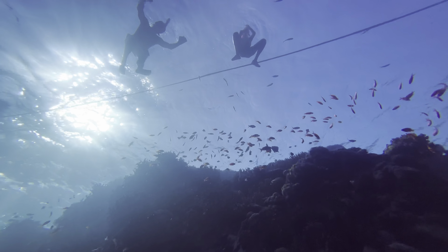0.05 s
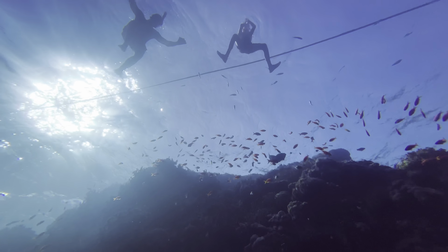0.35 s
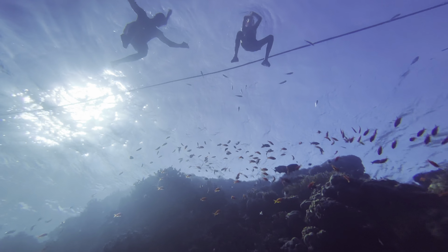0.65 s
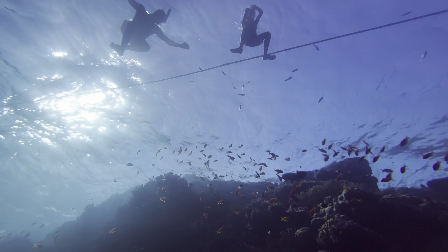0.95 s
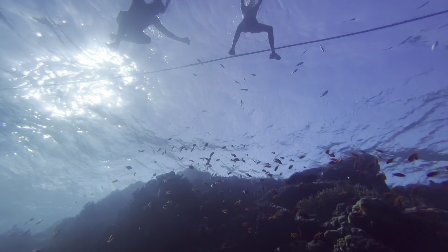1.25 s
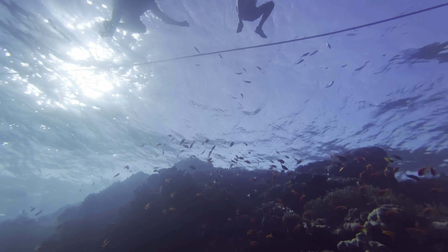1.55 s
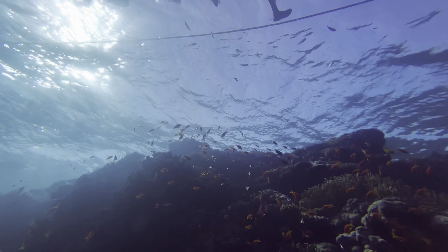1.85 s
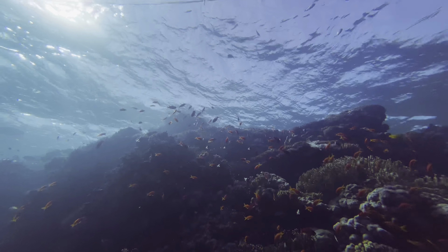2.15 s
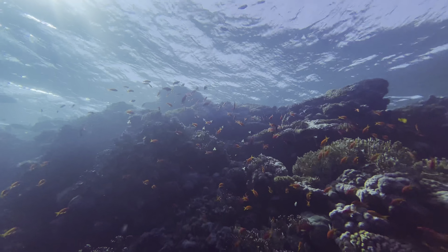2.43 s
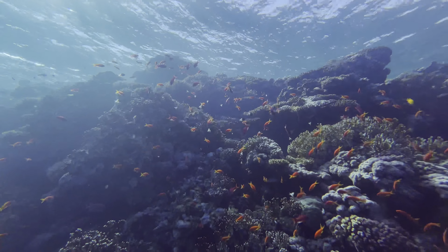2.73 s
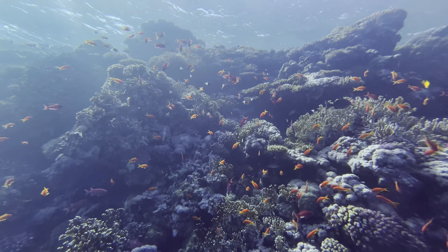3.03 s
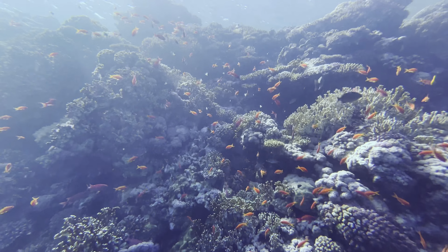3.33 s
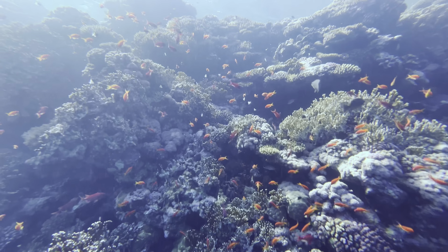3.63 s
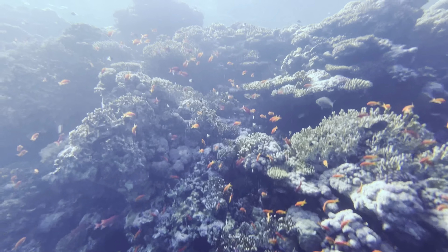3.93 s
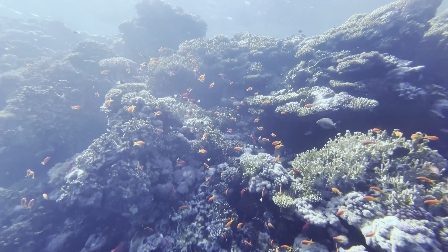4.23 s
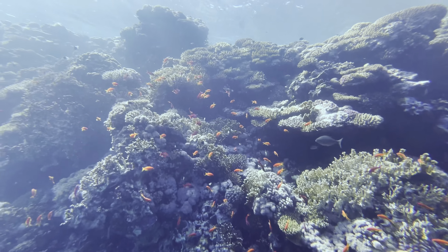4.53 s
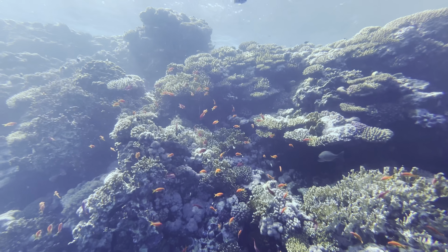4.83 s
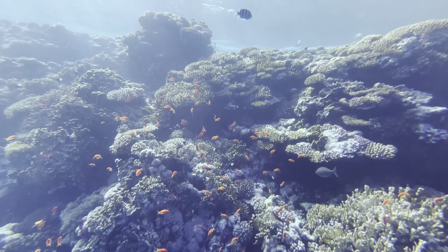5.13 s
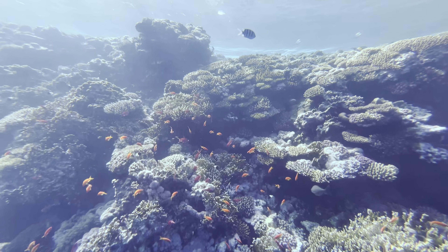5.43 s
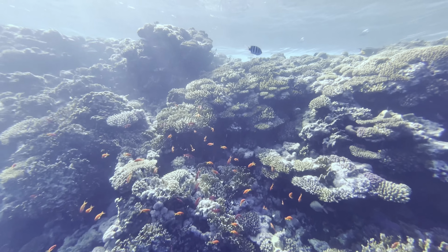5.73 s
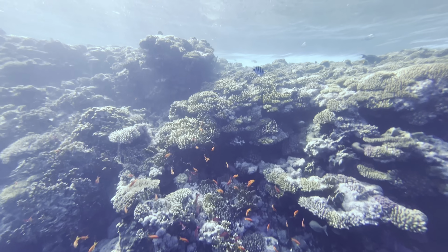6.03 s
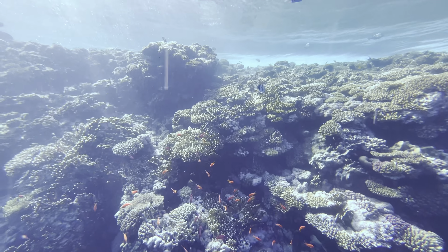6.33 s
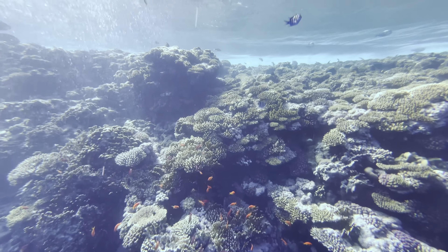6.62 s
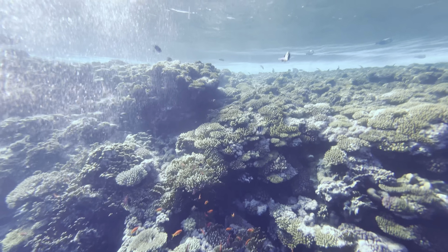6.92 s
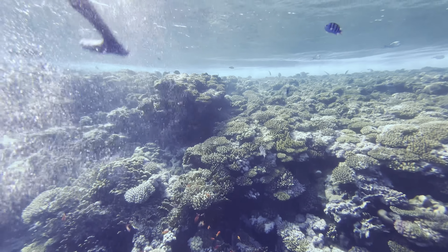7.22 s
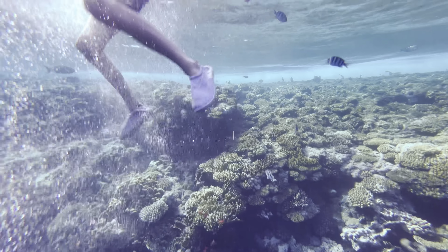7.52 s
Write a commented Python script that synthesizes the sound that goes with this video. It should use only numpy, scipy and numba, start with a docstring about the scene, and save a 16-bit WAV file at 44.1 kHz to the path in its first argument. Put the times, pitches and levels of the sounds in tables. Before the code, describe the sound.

Everything is muffled, heard underwater through a camera housing rising over a coral reef. A low rumble and faint sloshing run throughout, with scattered sharp shrimp clicks and a soft hollow drone. Two dull thumps come at the start, a knock at 1 second, a faint distant splash around 1.4 and a bubble plink at 2.2. From about 3.5 seconds the water gets busier and louder: bubbles plink, gurgle and fizz, water slaps the shell, and hollow gulps ring while the drone swells and sinks steadily in pitch. Splash thumps stand out between 4.5 and 5.2 seconds. The rumble deepens around 6 seconds under a fine sizzle of tiny bubbles. At 7.3 a swimmer's splash lands as a loud, deep boom with a knock; the bubbling and crackle drop fast, then partly recover as more heavy booms hit around 7.7 seconds.

```python
"""A camera in a watertight housing rises over a coral reef towards swimmers at the surface.
At first water rumbles and sloshes faintly, shrimp snap and a stroke splashes far off. On the way up,
gulps ring an air cavity that booms ever lower, bubbles plink, water slaps the shell and splashes arrive
as falling thumps. Near the end, after a loud boom, the water sounds drop fast and partly recover.
All is heard through the ringing housing and a limiter."""
import sys
import numpy as np
from scipy import signal
from scipy.fft import rfft, irfft, next_fast_len
from scipy.io import wavfile
from scipy.ndimage import uniform_filter1d, minimum_filter1d
from numba import njit

SR = 44100
rng = np.random.default_rng(int(sys.argv[2]) if len(sys.argv) > 2 else 0)


def unload_audio(sound):
    """Save the sound as a 16-bit wav file, at the path given as the first command line argument."""
    columns = np.transpose(np.atleast_2d(sound))
    # keep every value between -1 and 1, then stretch to whole-number steps
    steps = np.round(np.clip(columns, -1, 1) * 32767)
    wavfile.write(sys.argv[1], SR, steps.astype(np.int16))


N = 342657
TIME = np.arange(N) / SR


# Cavity resonance: time_s, pitch_hz, level_db
CAVITY = [(0, 311, -36.5), (1.6, 293, -35.5), (3.2, 253.2, -31.5), (4.2, 226.2, -22.5), (4.75, 210, -16.5),
          (5.35, 188, -29.5), (6.1, 155.2, -22), (6.65, 107.8, -25.5), (7.35, 86.7, -22.5),
          (7.77, 62.3, -27.5)]

def trapped_air(duck_db, width_hz=36, gain_db=-3.5, throb_db=3):
    """Flow stirs an air cavity; on the way up it swells, sinks in pitch and grows unsteady."""
    pitch_hz, level_db = curves(CAVITY)
    wobble = np.interp(TIME, [5.15, 5.8], [.026, .11])
    centre_hz = pitch_hz * np.exp(wobble * walk(30))
    boom = [resonate(resonate(flow, centre_hz, width_hz), centre_hz, 2 * width_hz)
            for flow in pair(N, apart=.22)]
    return unit(np.array(boom)) * undb(level_db + gain_db + duck_db + throb_db * walk(25))


# Cavity excitations: start_s, level_db, t60_s
GULP_HITS = [(1.185, -17.5, 0.16), (1.421, -9, 0.051), (2.784, -13.5, 0.19), (2.848, -14.5, 0.33),
             (3.923, -9.5, 0.05), (4.135, -17, 0.24), (4.352, -8, 0.14), (4.48, -9.5, 0.21),
             (4.724, -4, 0.36), (5.014, -12.5, 0.21), (5.133, -6, 0.08), (5.614, -13.5, 0.26),
             (5.759, -7, 0.17), (6.096, -7.5, .14), (6.792, -7.5, 0.27), (7.351, 4, 0.19),
             (7.404, -1.5, 0.23), (7.685, 4, .2)]

def gulps(gain_db=2.5, squeeze=.13, relax_s=.013, attack_s=.0071, wobble=.044, shudder_db=1.26):
    """Each gulp squeezes the trapped air: it rings sharp, then settles and shudders as it dies."""
    cavity_hz = curves(CAVITY)[0] * np.exp(wobble * walk(60))
    out = np.zeros(N)
    for start_s, level_db, t60_s in GULP_HITS:
        t = TIME[:int(t60_s * SR)]
        pitch_hz = np.interp(start_s + t, TIME, cavity_hz) * (1 + squeeze * np.exp(-t / relax_s))
        add(out, start_s, undb(level_db) * tone(pitch_hz) * fade(t, t60_s) * rise(t, attack_s))
    return out * undb(gain_db + shudder_db * walk(90))


# Splash thumps: start_s, level_db, swell_s, start_hz
THUMP_HITS = [(0.104, -16, .009, 296), (0.208, -12.5, 0.011, 170), (1.144, -29.5, 0.0044, 398),
              (2.609, -25.5, 0.0069, 202.5), (2.955, -16.5, 0.006, 207), (4.026, -11.5, 0.0048, 231),
              (4.337, -13, 0.016, 187), (4.5752, -4, 0.0065, 379), (4.833, -3.5, 0.0064, 331),
              (5.162, 3.5, 0.0067, 368), (6.036, -11, 0.0037, 485), (6.452, -13.5, 0.0056, 453),
              (6.524, -11, 0.0091, 118.8), (7.337, 5.5, 0.0036, 368), (7.657, 8, 0.0058, 286),
              (7.677, 2, 0.011, 131.4)]
# Torn air: freq_hz, level_db
BURBLE_SPECTRUM = [(40, -20), (150, 3.5), (330, -5.5), (620, -9.5), (1200, -44.5), (4000, -94)]

def thumps(fall_s=.0062, end_hz=48, roughness=.16, burble_db=-15, burble_t60_s=.13):
    """Splashes in shallow water: lows travel slowest, so each thump falls; torn air burbles after it."""
    out, t = np.zeros(N), TIME[:SR // 5]
    for start_s, level_db, swell_s, start_hz in THUMP_HITS:
        cycles = (start_hz - end_hz) * fall_s * rise(t, fall_s) + end_hz * t
        shake, burble = map(unit, colour(rng.standard_normal((2, len(t))), BURBLE_SPECTRUM))
        envelope = t / swell_s * np.exp(1 - t / swell_s)
        push = -np.sin(2 * np.pi * cycles) * envelope * (1 + roughness * shake)
        tail = undb(burble_db) * burble * rise(t, swell_s) * fade(t, burble_t60_s)
        add(out, start_s, undb(level_db) * (push + tail))
    return out


# Single bubbles: start_s, level_db, pitch_hz, t60_s
NEAR_BUBBLES = [(1.143, -34, 1093, 0.032), (1.46, -33.5, 1243, 0.034), (2.163, -7, 559, 0.044),
                (3.408, -26.5, 1062, 0.065), (3.410, -22.5, 401, 0.089), (3.452, -15.5, 996, 0.058),
                (3.454, -20, 432.5, 0.13), (3.84, -15.5, 612, 0.043), (3.999, -15.5, 652, 0.064),
                (4.329, -10.5, 557, 0.032), (4.992, -18.5, 626, 0.042), (5.013, -20, 960, 0.031),
                (5.487, -17.5, 632, 0.03), (5.661, -21, 865, 0.07), (5.661, -16, 624, .09),
                (5.807, -18.5, 636, 0.065), (6.035, -12.5, 654, 0.07), (6.036, -10.5, 360, 0.046),
                (6.096, -7, 639, 0.11), (6.235, -21, 660, 0.063), (6.273, -15, 625, 0.089),
                (6.454, -11.5, 557, 0.047), (6.622, -14, 620, 0.031), (6.782, -18.5, 603, 0.074),
                (7.036, -17, 619, 0.08), (7.261, -17.5, 623, 0.11), (7.345, -19, 156.4, 0.44)]

def plinks(gain_db=5):
    """Single bubbles break free close by and ring."""
    out = np.zeros(N)
    for start_s, level_db, pitch_hz, t60_s in NEAR_BUBBLES:
        add(out, start_s, undb(level_db + gain_db) * bubble(pitch_hz, t60_s, glide=.04, attack_s=.0016))
    return out


# Water impacts: start_s, level_db, edge_re_knock_db
SLAP_HITS = [(0.102, -31, -29), (1.044, -16.5, 4), (1.049, -22.5, -2.5), (1.755, -24, -3.5),
             (2.163, -16.5, -14), (3.776, -27.5, 9.5), (4.330, -11.5, -32.5), (4.573, -7.5, -11.5),
             (4.835, -28.5, -18.5), (5.160, -21.5, -25), (5.88, -26.5, -20), (6.036, -27.5, -24),
             (7.3356, -8.5, -8), (7.6568, -12, -22), (7.685, -19, -15)]
# Hollow knock: freq_hz, level_db
KNOCK_SPECTRUM = [(300, -17.5), (600, 9.5), (880, -3), (1500, -1.5), (2150, -11.5), (2700, -10),
                  (3100, -28), (3800, -17.5), (14000, -54.5)]
# Bright edge: freq_hz, level_db
EDGE_SPECTRUM = [(600, -17.5), (1500, -3), (2000, -6), (2900, -8), (3750, 2.5), (4700, -9.5), (6200, -12),
                 (8000, -29.5), (10900, -22), (12400, -37.5), (14100, -35.5), (16000, -56.5)]

def slaps():
    """Water slaps the housing: a hollow knock with a bright edge."""
    out = np.zeros((2, N))
    for start_s, level_db, edge_db in SLAP_HITS:
        knock = crack(KNOCK_SPECTRUM, t60_s=.038, tail_db=-21.5, tail_t60_s=.039)
        edge = crack(EDGE_SPECTRUM, t60_s=.013, tail_db=-24, tail_t60_s=.095)
        add(out, start_s, undb(level_db) * (knock + undb(edge_db) * edge))
    return out


# Eddy pressure: freq_hz, level_db
EDDY_SPECTRUM = [(15, -31.5), (30, -10.5), (55, 3.5), (90, -1), (140, -4.5), (200, -5.5), (300, -20),
                 (900, -71.5), (16000, -130)]
# Deep surge: freq_hz, level_db
SURGE_SPECTRUM = [(15, -31.5), (30, -15), (50, 3), (68, -4), (95, 1.5), (130, -22), (500, -81),
                  (16000, -140)]

def rumble(level_db, duck_db, eddy_gain_db=1, surge_db=-17):
    """Eddies press on the housing; near the swimmers a deep surge joins them."""
    eddies = unit(colour(pair(N, apart=.013), EDDY_SPECTRUM))
    eddies *= undb(level_db + eddy_gain_db + 3 * walk(14))
    surge = unit(colour(rng.standard_normal(N), SURGE_SPECTRUM))
    surge *= undb(surge_db + approach(arrive_s=6.955, db_per_s=23) - 2 * walk(16))
    return (eddies + surge) * undb(duck_db)


# Merged far bubbles: freq_hz, level_db
WASH_SPECTRUM = [(70, -11), (150, 1), (310, 3), (390, -4), (480, -4), (590, 8), (720, -5), (920, -15),
                 (1200, -21.5), (1520, -22.5), (1780, -45.5), (2600, -44), (6000, -63.5), (12000, -85)]
# Large bubbles: freq_hz, level_db
GURGLE_SPECTRUM = [(200, -22.5), (345, -8.5), (460, -8.5), (550, -9), (630, 5), (700, -3), (800, -6),
                   (1000, -23), (1500, -49.5), (1900, -41), (3000, -53), (12000, -99)]
# Small bubbles: freq_hz, level_db
FIZZ_SPECTRUM = [(600, -20), (900, 1.5), (1300, -1), (1600, -2.5), (2000, -24), (2300, -33), (3400, -10),
                 (12000, -77.5)]
# Fine bubbles: freq_hz, level_db
MIST_SPECTRUM = [(1900, -25.5), (2450, -4), (2850, -17.5), (3400, -7), (6200, -12.5), (16000, -56.5)]

def slosh(level_db, fizz_lift_db, wash_db=7, gurgle_db=14, fizz_db=-7.5, mist_db=-12, mist_peak_s=6.15):
    """Waves and kicks churn bubbles of three sizes: a wash from afar, distinct when closer."""
    large = swarm(low_hz=280, high_hz=1200, cycles=18, spread_db=2.8, count=2700)
    small = swarm(low_hz=850, high_hz=3500, cycles=40, spread_db=3.3, count=3200)
    fine = swarm(low_hz=2100, high_hz=7500, cycles=50, spread_db=3.4, count=2200)
    wash = unit(colour(pair(N, apart=.13), WASH_SPECTRUM)) * undb(wash_db)
    gurgle = unit(colour(large, GURGLE_SPECTRUM))
    gurgle *= undb(gurgle_db + approach(arrive_s=5.7, db_per_s=3) + 2.5 * walk(35))
    distinct = undb(-1 + approach(arrive_s=4.4, db_per_s=2.5))
    blur = pair(N, apart=.36) * np.sqrt(1 - distinct ** 2)
    fizz = unit(colour(small * distinct + blur, FIZZ_SPECTRUM))
    fizz *= undb(fizz_db + approach(arrive_s=3.7, db_per_s=1.5) + fizz_lift_db)
    mist = unit(colour(fine, MIST_SPECTRUM)) * undb(mist_db - 8.5 * np.abs(TIME - mist_peak_s))
    return (wash + gurgle + fizz + mist) * undb(level_db + 1.5 * walk(12))


# Near claw snaps: start_s, level_db, treble_db
SNAP_HITS = [(0.144, -40, 2), (0.375, -38, -7), (0.7082, -31.5, -10), (0.779, -35.5, -2), (0.803, -41.5, 5),
             (1.1957, -34.5, 7), (1.2126, -31.5, -8), (1.307, -37.5, -1), (1.514, -34.5, -6),
             (1.552, -34.5, -3), (1.969, -33, -9), (2.01, -32.5, -6), (2.069, -33, -4), (2.292, -29, 7),
             (2.3755, -30, -12), (2.894, -28.5, -11), (2.937, -32.5, -9), (3.507, -27.5, -16),
             (3.5605, -38.5, 5), (3.989, -36.5, 2.5), (4.065, -31.5, -9), (4.386, -29.5, -16),
             (4.563, -22, -5.5), (4.8176, -43, 9), (5.519, -37, -0.5), (5.899, -36.5, 5.5),
             (5.923, -30, -3), (5.976, -40, 9), (6.113, -40.5, 16.5), (6.194, -35.5, 3), (6.325, -35.5, 5),
             (6.3611, -28, -6), (6.8146, -23, -6), (6.8358, -24.5, -7), (6.868, -26.5, -10),
             (7.066, -31, 4), (7.128, -31, 1), (7.2315, -36, 2), (7.2731, -23, -8)]
# Sharp snap: freq_hz, level_db
SNAP_SPECTRUM = [(600, -15.5), (1500, -8), (2000, -19), (2900, -12.5), (3750, 1.5), (4200, -6), (4700, -5),
                 (5400, -11), (6200, -8.5), (7300, -25.5), (9000, -23.5), (10900, -20.5), (12400, -35.5),
                 (14100, -35.5), (16000, -54)]

def shrimp(duck_db, reef_db=-63, spread_db=9, hiss_db=-4, snap_gain_db=1, count=900):
    """Snapping claws: a hiss from afar, a dense crackle and single near snaps."""
    crackle = np.zeros((2, N))
    for when, chance in rng.random((count, 2)):
        burst = pair(700, apart=.3) * fade(TIME[:700], .011)
        add(crackle, when * N / SR, burst * undb(-spread_db * np.log(.03 + chance)))
    hiss = undb(hiss_db) * pair(N, apart=1)
    out = unit(colour(unit(crackle) + hiss, SNAP_SPECTRUM)) * undb(reef_db + duck_db)
    for start_s, level_db, treble_db in SNAP_HITS:
        snap = crack(SNAP_SPECTRUM, t60_s=.018, tail_db=-20, tail_t60_s=.087,
                     vary_db=3.5, treble_db=treble_db)
        add(out, start_s, undb(level_db + snap_gain_db) * snap)
    return out


def whoop(start_s=5.305, length_s=.14, start_hz=210, top_hz=490, rise_s=.02, sag_hz_per_s=250):
    """A soft hollow whoop slides up, holds and sags a little."""
    t = TIME[:int(length_s * SR)]
    pitch_hz = start_hz + (top_hz - start_hz) * rise(t, rise_s) - sag_hz_per_s * t
    out = np.zeros(N)
    add(out, start_s, undb(-33) * np.sin(np.pi * t / length_s) * tone(pitch_hz))
    return out


# Distant stroke: freq_hz, level_db
SPLASH_SPECTRUM = [(350, -3.5), (620, 8), (880, -3), (1250, -0.5), (1900, -22.5), (5000, -25), (12000, -66)]

def far_splash(start_s=1.386, attack_s=.04, hold_s=.17, t60_s=.69, level_db=-41):
    """A stroke breaks the surface some way off: a soft wash rises quickly and drains away."""
    t = np.maximum(TIME - start_s, 0)
    envelope = np.minimum(t / attack_s, 1) * fade(np.maximum(t - attack_s - hold_s, 0), t60_s)
    wash = unit(colour(pair(N, apart=.24), SPLASH_SPECTRUM))
    return wash * envelope * undb(level_db + 2.5 * walk(40))


# Tiny bubble clouds: freq_hz, level_db
SIZZLE_SPECTRUM = [(1000, -10), (2000, -6.5), (2800, -14), (3700, 0.5), (4700, -4.5), (6200, -2),
                   (7800, -16.5), (10800, -16), (13000, -37)]

def sizzle(lift_db, level_db=-68, spray_db=-3):
    """Surges carry clouds of tiny bubbles past: short ticks in a soft spray."""
    ticks = swarm(low_hz=1800, high_hz=7500, cycles=28, spread_db=4, count=3200)
    cloud = unit(colour(ticks + undb(spray_db) * pair(N, apart=.96), SIZZLE_SPECTRUM))
    return cloud * undb(level_db + approach(arrive_s=6.2, db_per_s=.5) + lift_db + walk(30))


def pops(lift_db, duck_db, level_db=-63.5, follow=.4, spread_db=5.5, count=260):
    """Tiny bubbles burst against the shell in uneven ticks, harder when a surge passes."""
    out = np.zeros((2, N))
    for when, chance in rng.random((count, 2)):
        tick = crack(SNAP_SPECTRUM, t60_s=.006, tail_db=-26, tail_t60_s=.025,
                     vary_db=7, treble_db=14, size=1024)
        add(out, when * N / SR, tick * undb(-spread_db * np.log(.05 + chance)))
    return out * undb(level_db + follow * lift_db + duck_db)


def thin_ring(deep, pitch_hz=9550, width_hz=400, gain_db=-67):
    """A faint, thin ring near 9.5 kHz that swells with the loud low thumps."""
    centre_hz = np.full(N, pitch_hz)
    ring = resonate(resonate(rng.standard_normal(N), centre_hz, width_hz), centre_hz, width_hz)
    return unit(ring) * undb(gain_db) * uniform_filter1d(np.abs(deep), size=1200)


# Passing surges: peak_s, half_length_s, rumble_db, slosh_db, fizz_db, sizzle_db
SURGES = [(0.127, 0.083, -3, 5, -17, -5), (2.599, 0.61, -0.5, 1, 7, 3.5), (3.509, 0.075, 6, 8, 4, 2),
          (4.037, 0.12, 3, 1.5, 9, 8), (4.373, 0.34, 3.5, 3, 0, 13.5), (4.723, 0.087, 1.5, 2, 10, 4),
          (5.39, 0.079, -0.5, 2, 9.5, 1), (6.176, 0.11, -4, 3, 1, 9), (7.054, 0.52, -6.5, -0.5, -4.5, 12.5)]

def surge_lifts():
    """Surges sweep past: bell-shaped lifts in dB of rumble, slosh, fizz and sizzle."""
    return sum(np.outer(lifts_db, np.exp(-((TIME - peak_s) / half_s) ** 2))
               for peak_s, half_s, *lifts_db in SURGES)


def duck(start_s=7.335, drop_s=.037, recover_from_s=7.53, recover_s=.19, remaining=.29):
    """Dip depth, 0-1: after a loud boom the water sounds drop fast, stay low and partly recover."""
    drop = np.clip((TIME - start_s) / drop_s, 0, 1)
    recovery = np.clip((TIME - recover_from_s) / recover_s, 0, 1)
    return drop * (1 - (1 - remaining) * recovery)


# Microphone balance: freq_hz, left_minus_right_db
MIC_BALANCE = [(50, -1.5), (140, -4), (220, -9.5), (300, -9.5), (400, -1.5), (630, 4.5), (850, 7.5),
               (1100, 1.5), (1550, 11.5), (2400, 0), (2850, 6.5), (3600, 19), (5500, 11), (7600, 2.5),
               (9500, -1), (15000, 0.5)]
# Microphone phase: freq_hz, left_lead_rad
MIC_PHASE = [(50, -.1), (150, 0), (300, .8), (400, 2), (630, 3), (870, 3.5), (1300, 5.5), (2050, 7),
             (2450, 6), (2800, 6.8), (3700, 12.6), (5500, 15), (7600, 15.7), (9500, 12.4), (15000, 7)]

def housing(x):
    """The shell bends, so each microphone hears its own level and phase at each pitch."""
    size = 2 * next_fast_len(N // 2 + 1024, True)
    ratio = undb(over_pitch(MIC_BALANCE, size) / 2)
    turn = np.exp(.5j * over_pitch(MIC_PHASE, size))
    response = np.array([ratio * turn, 1 / (ratio * turn)]) / np.sqrt((ratio ** 2 + ratio ** -2) / 2)
    return irfft(response * rfft(x, size))[:, :N]


def bubble(hz, t60_s, glide, attack_s):
    """A pulsating bubble: a dying sine whose pitch slides up."""
    t = TIME[:int(t60_s * SR) + 2]
    return np.sin(2 * np.pi * hz * t * (1 + glide * t / t60_s)) * fade(t, t60_s) * rise(t, attack_s)


def swarm(low_hz, high_hz, cycles, spread_db, count):
    """Bubbles of random size and strength; each swells in about two cycles."""
    out = np.zeros(N)
    for when, height, chance, life in rng.random((count, 4)):
        hz = low_hz * (high_hz / low_hz) ** height
        ring = bubble(hz, t60_s=cycles * (.5 + life) / hz, glide=.024, attack_s=2 / hz)
        add(out, when * N / SR, ring * undb(-spread_db * np.log(.02 + chance)))
    return unit(out)


def crack(spectrum, t60_s, tail_db, tail_t60_s, vary_db=0, treble_db=0, treble_hz=7000, size=4096):
    """A sharp coloured burst with a short scatter off the reef, at constant energy."""
    t = TIME[:size]
    varied = [(hz, db + vary_db * rng.standard_normal() + treble_db * (hz > treble_hz))
              for hz, db in spectrum]
    envelope = (fade(t, t60_s) + undb(tail_db) * fade(t, tail_t60_s)) * rise(t, .0004)
    burst = colour(pair(size, apart=.96) * envelope, varied, size)
    return burst * np.sqrt(40) / np.linalg.norm(burst)


def approach(arrive_s, db_per_s):
    """Level in dB of a source that grows until the camera reaches it."""
    return -db_per_s * np.maximum(arrive_s - TIME, 0)


def pair(size, apart):
    """Two-microphone noise; apart is the share of power that differs."""
    common = np.sqrt(1 - apart) * rng.standard_normal(size)
    return common + np.sqrt(apart) * rng.standard_normal((2, size))


def walk(rate_hz):
    """Smooth random drift, rms 1."""
    hold = int(SR / rate_hz)
    steps = np.repeat(rng.standard_normal(N // hold + 1), hold)
    return unit(uniform_filter1d(uniform_filter1d(steps, hold), hold)[:N])


@njit
def resonate(x, centre_hz, width_hz):
    """State-variable band-pass with a moving centre."""
    out, band_state, low_state = np.empty(len(x)), 0., 0.
    for i in range(len(x)):
        gain, damping = np.tan(np.pi * centre_hz[i] / SR), width_hz / centre_hz[i]
        band = (band_state + gain * (x[i] - low_state)) / (1 + gain * (gain + damping))
        band_state = 2 * band - band_state
        low_state += 2 * gain * band
        out[i] = damping * band
    return out


def colour(x, spectrum, size=4096):
    """Minimum-phase filter with the given spectrum."""
    cepstrum = irfft(np.log(undb(over_pitch(spectrum, size))))
    cepstrum[1:size // 2] *= 2
    cepstrum[size // 2 + 1:] = 0
    impulse = irfft(np.exp(rfft(cepstrum)))
    return signal.fftconvolve(np.atleast_2d(x), impulse[None], axes=1)[:, :x.shape[-1]]


def over_pitch(table, size):
    """Table interpolated over log frequency at the FFT bins."""
    freq_hz, values = np.transpose(table)
    bins_hz = np.maximum(np.arange(size // 2 + 1) * SR / size, 1)
    return np.interp(np.log(bins_hz), np.log(freq_hz), values)


def curves(table):
    """Table columns interpolated over time."""
    time_s, *columns = np.transpose(table)
    return [np.interp(TIME, time_s, column) for column in columns]


def add(track, start_s, sound):
    """Mix a sound into a track."""
    start = int(np.clip(start_s * SR, 0, N - 1))
    track[..., start:start + sound.shape[-1]] += sound[..., :N - start]


def tone(pitch_hz):
    """Sine with a moving pitch."""
    return np.sin(2 * np.pi * np.cumsum(pitch_hz) / SR)


def rise(t, tau_s):
    """Exponential rise to 1."""
    return 1 - np.exp(-t / tau_s)


def fade(t, t60_s):
    """Exponential decay."""
    return np.exp(-np.log(1000) * t / t60_s)


def undb(db):
    """Decibels to gain."""
    return 10 ** (np.asarray(db) / 20)


def unit(x):
    """Scale to rms 1."""
    return x / np.sqrt(np.mean(x ** 2))


# Steady flow, rougher towards the surface: time_s, rumble_db, slosh_db
FLOW = [(0, -32, -46.5), (0.7, -40, -49), (3.3, -35.5, -50), (4.1, -33, -48.5), (5.05, -31.5, -42.5),
        (5.25, -33, -52), (5.75, -24, -45.5), (7.77, -30.5, -40.5)]

def scene():
    """Everything in the water reaches the microphones through the housing."""
    rumble_db, slosh_db = curves(FLOW)
    rumble_lift_db, slosh_lift_db, fizz_lift_db, sizzle_lift_db = surge_lifts()
    dip = duck()
    deep = trapped_air(duck_db=-5 * dip) + gulps() + thumps()
    water = rumble(rumble_db + rumble_lift_db, duck_db=-9 * dip)
    water += slosh(slosh_db + slosh_lift_db - 24 * dip, fizz_lift_db)
    reef = shrimp(duck_db=-11 * dip)
    froth = sizzle(sizzle_lift_db - 20 * dip) + pops(sizzle_lift_db, duck_db=-20 * dip)
    background = thin_ring(deep) + far_splash() + reef + froth
    return housing(deep + plinks() + slaps() + water + whoop() + background)


def record(dry, ceiling=1, recovery_s=.07, cutoff_hz=15800):
    """A limiter ducks on the loudest thumps and recovers; a low-pass cuts the top."""
    recovery = TIME / recovery_s
    excess = np.log(np.maximum(np.abs(dry).max(axis=0) / ceiling, 1))
    reduction = np.maximum.accumulate(excess + recovery) - recovery
    gain = uniform_filter1d(minimum_filter1d(np.exp(-reduction), size=89), size=89)
    return signal.sosfilt(signal.ellip(8, .2, 70, cutoff_hz, fs=SR, output="sos"), dry * gain)


dry = scene()
out = record(dry)
unload_audio(out)
```